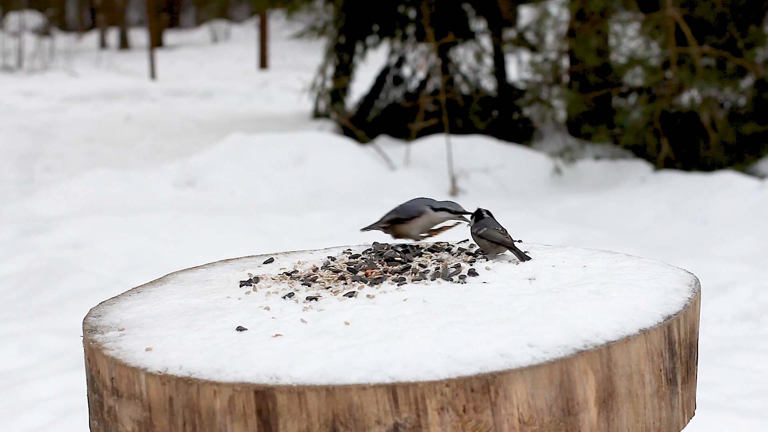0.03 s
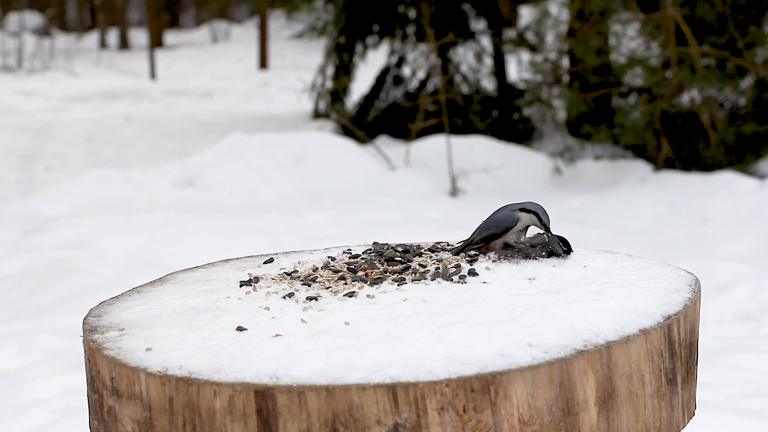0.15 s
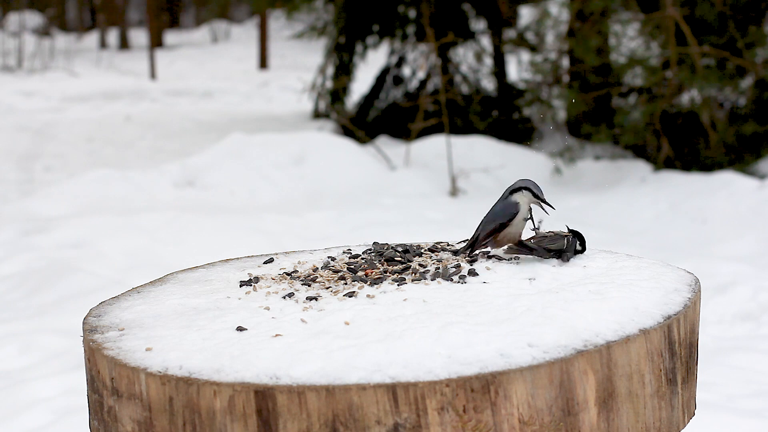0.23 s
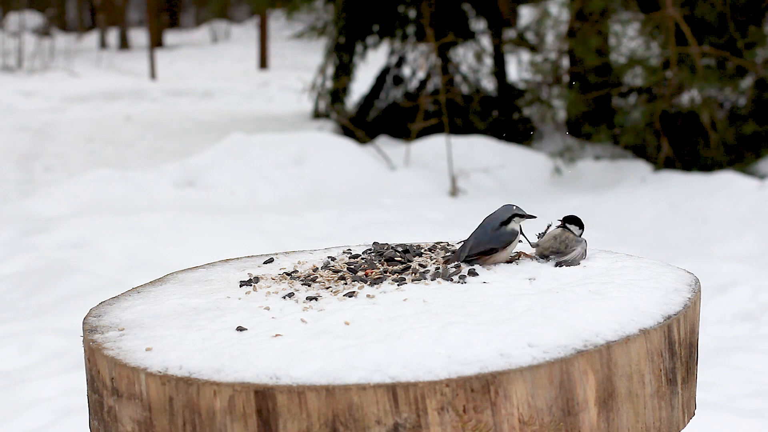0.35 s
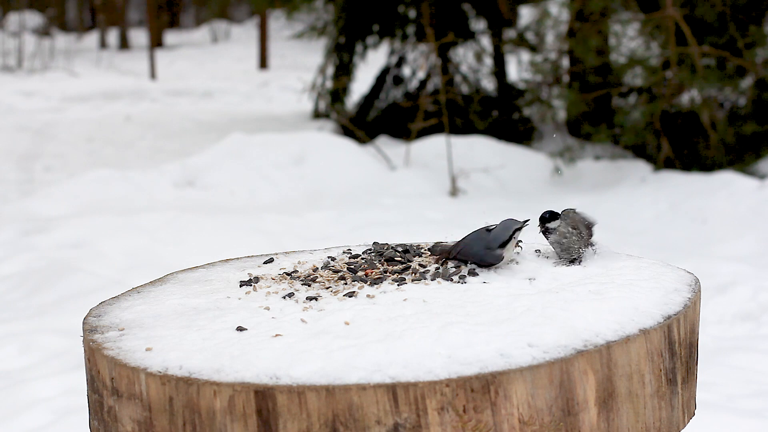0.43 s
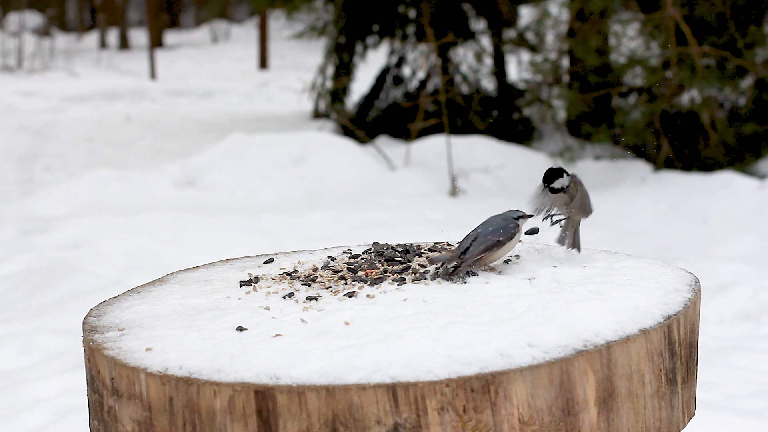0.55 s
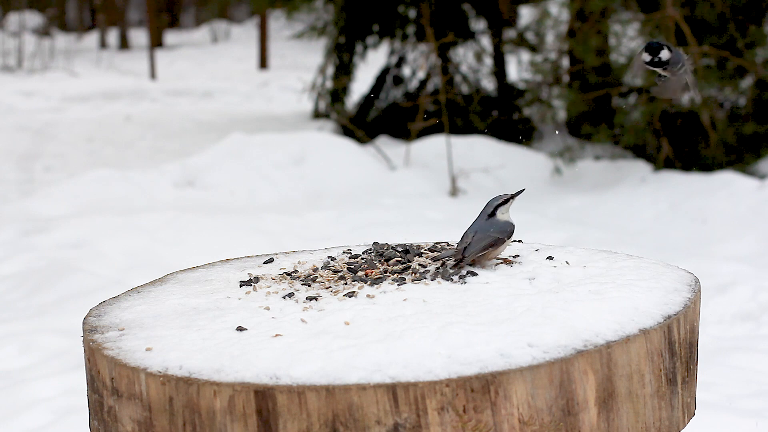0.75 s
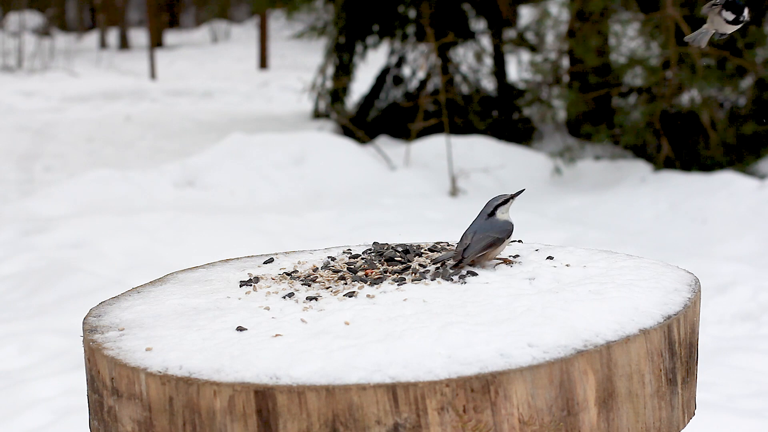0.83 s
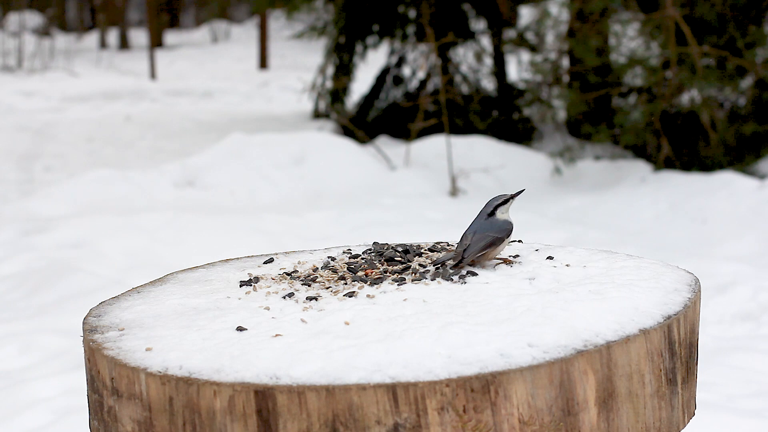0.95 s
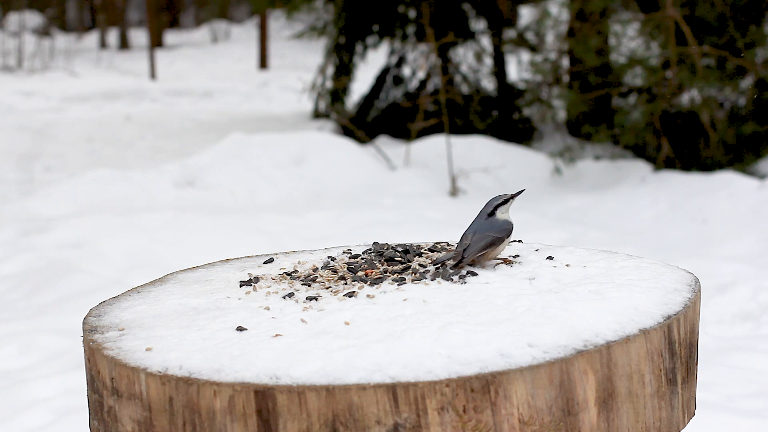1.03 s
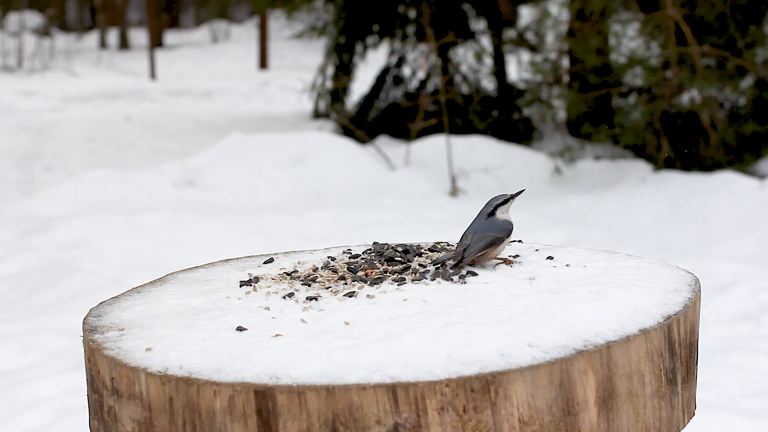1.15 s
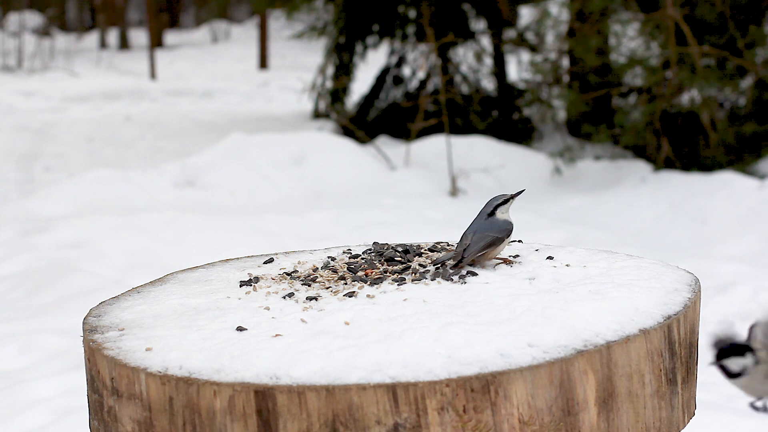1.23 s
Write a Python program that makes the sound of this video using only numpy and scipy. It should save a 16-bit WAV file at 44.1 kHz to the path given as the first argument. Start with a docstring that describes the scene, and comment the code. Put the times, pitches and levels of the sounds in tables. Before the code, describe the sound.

A small bird chirps five quick high notes while wings flutter in a scuffle.

```python
"""Wings flutter close to the microphone: two small birds scuffle on a feeding stump by a snowy wood.
Five thin whistled chirps each climb in steps from 7 kHz to 9 or 10 kHz, crossed by two harsh squeaks.
Claws tick on seeds, feathers rustle, and beating wings hum in a soft rush of air.
The trees throw back a faint echo, and a low distant rumble lies under everything."""
import sys
import numpy as np
from scipy import signal
from scipy.fft import rfft, irfft
from scipy.io import wavfile
from scipy.ndimage import uniform_filter1d

SR = 44100
rng = np.random.default_rng(int(sys.argv[2]) if len(sys.argv) > 2 else 0)


def transcribe(u):
    """Save the signal u as a 16-bit wav file named by the first command-line argument.

    u: samples, shape (n,) or (channels, n), limited to [-1, 1]; the rate is SR.
    q: integer samples, one column per channel.
    """
    v = np.clip(np.atleast_2d(u).T, -1, 1)
    q = np.round(v * 32767).astype(np.int16)
    wavfile.write(sys.argv[1], SR, q)


N = 57330
T = np.arange(N) / SR
CUTOFF_HZ = 15900


def chirps():
    """Nearly pure whistles at the stump, gliding up in steps, with a faint octave where they are loud."""
    # One list per chirp. Each row: time in seconds, pitch in Hz, relative level in dB.
    contours = [
        [(0.2258, 7120, -30.1), (0.2268, 7700, -22.0), (0.233, 7990, -15.5), (0.2407, 8110, -14.0),
         (0.2467, 8940, -18.4), (0.2567, 8910, -16.2), (0.261, 9230, -18.5), (0.2632, 8840, -20.0),
         (0.2649, 7410, -29.2)],
        [(0.293, 7260, -16.3), (0.294, 7210, -11.8), (0.3012, 7250, -7.3), (0.3077, 7410, -7.5),
         (0.3132, 8130, -10.5), (0.3237, 8190, -10.7), (0.3287, 9150, -16.3), (0.3302, 8790, -19.3),
         (0.3312, 8480, -28.3)],
        [(0.3637, 7000, -17.0), (0.3647, 7010, -11.0), (0.3692, 7300, -6.2), (0.3739, 7660, -5.5),
         (0.3817, 8660, -11.5), (0.3861, 8360, -9.7), (0.3946, 8300, -11.6), (0.4001, 9240, -20.0),
         (0.4021, 8640, -27.5)],
        [(0.4438, 7250, -12.3), (0.4453, 7250, -7.9), (0.4498, 7280, -5.5), (0.4578, 7330, -6.8),
         (0.4627, 8310, -4.2), (0.4685, 8100, -3.0), (0.4752, 8420, -4.3), (0.4805, 9740, -14.4),
         (0.4847, 9710, -17.0), (0.4877, 9320, -22.1), (0.4889, 9120, -28.4)],
        [(0.5466, 7080, -14.1), (0.5476, 7100, -10.8), (0.5536, 7100, -6.4), (0.5606, 7170, -4.8),
         (0.5668, 8660, -11.6), (0.5763, 8200, -9.6), (0.5783, 8290, -10.4), (0.5823, 9640, -16.5),
         (0.5848, 10030, -16.1), (0.5935, 9070, -15.0), (0.5975, 9080, -19.8), (0.5992, 8910, -28.9)],
    ]
    # One value per chirp: its second harmonic in dB at full scale; the share grows with loudness.
    octaves_db = [-31, -26, -26.5, -29, -18.5]
    glide_s, waver_share, trim_db = .00037, .002, -.1
    calls = 0
    for rows, octave_db in zip(contours, octaves_db):
        hz, db = [uniform_filter1d(curve, int(glide_s * SR)) for curve in in_time(rows)]
        phase = wavering_phase(hz, waver_share, rate_hz=400)
        level = from_db(db + trim_db) * gate(rows)
        octave = from_db(octave_db) * level * np.sin(2 * phase)
        calls += np.sqrt(2) * level * (np.sin(phase) + octave)
    return calls


def squeaks():
    """Harsh calls at the stump: unsteady pulses that speed up and brighten, with hiss on every pulse."""
    # One list per squeak. Each row: time in seconds, pulse rate in Hz, level in dB, tilt in dB per octave.
    contours = [
        [(.2942, 1080, -32, -5.5), (.2975, 1143, -32, -4), (.299, 1798, -30.5, -4.5), (.3027, 1900, -30.5, 1),
         (.304, 1900, -51.5, -2.5)],
        [(.3358, 950, -30, -3.5), (.338, 1250, -25, -3.5), (.3396, 1570, -29, -3.5), (.341, 2050, -24.5, 4),
         (.3434, 2214, -22.5, 1.5), (.3452, 2750, -18.5, 5.5), (.3475, 3800, -42, -2.5),
         (.3503, 5900, -35.5, -1)],
    ]
    # The colour of the voice. Each row: frequency in Hz, relative level in dB.
    voice_colour = [(900, -3.5), (2200, 0.5), (3300, -8.5), (4800, 2), (7000, -4.5), (9200, 4),
                    (11000, -14), (13000, -23.5), (16000, -28)]
    jitter_share, shimmer_db, hiss_db = .031, 3, -11.5
    calls = 0
    for rows in contours:
        hz, db, tilt = in_time(rows)
        phase = wavering_phase(hz, jitter_share, rate_hz=600)
        tone, power = 0, 1e-9
        for k in range(1, 13):
            gain = from_db(at_hz(voice_colour, k * hz) + tilt * np.log2(k)) * (k * hz < CUTOFF_HZ)
            tone += gain * np.sin(k * phase) * from_db(shimmer_db * drift(300))
            power += gain ** 2 / 2
        hiss = from_db(hiss_db) * noise(voice_colour) * (1 + np.cos(phase))
        calls += from_db(db) * gate(rows) * (tone / np.sqrt(power) + hiss)
    return calls


def wings():
    """Each close stroke is a short swell of grainy feather noise; a lighter rustle goes on between."""
    # Wing strokes. Each row: peak time in seconds, level in dB, half length in seconds,
    # tilt in dB per octave.
    wingbeats = [(0.047, -48, 0.0077, 0), (.076, -40.5, 0.0013, 0.5), (0.11, -45.5, 0.0053, -1.5),
                 (0.185, -45, .008, 0.5), (0.208, -48, 0.014, 7), (0.266, -45.5, 0.012, 5.5),
                 (0.393, -38, 0.0049, 4.5), (0.429, -45, .006, 2), (0.463, -41, 0.0081, 8),
                 (.511, -49, 0.013, 1), (0.526, -39.5, 0.0067, 2), (0.549, -32.5, 0.0014, 0),
                 (.571, -49, .005, -2), (0.592, -39.5, 0.008, 2.5), (0.621, -47, 0.0091, 0),
                 (0.64, -40, 0.0095, 1), (0.702, -46, 0.018, 1), (0.714, -48.5, 0.0059, -3),
                 (.746, -48.5, 0.0072, 0), (0.786, -47, 0.014, 1), (.862, -49.5, 0.015, 0.5),
                 (.902, -48, 0.0058, -6.5), (1.068, -49.5, 0.0078, -7.5), (1.088, -47, 0.0024, -1.5),
                 (1.195, -48, .006, 1), (1.226, -48.5, .006, -5), (1.26, -47.5, 0.0066, -6)]
    # The colour of rubbing feathers. Each row: frequency in Hz, relative spectral density in dB.
    feather_colour = [(300, -16.5), (1000, 0), (2200, 2.5), (4000, -4), (6000, -6.5), (9000, -6.5),
                      (12000, -5.5), (16000, -10)]
    # Loose feathers and scattered seed. Each row: time in seconds, level in dB.
    rustle_levels = [(0, -65), (.15, -55), (.45, -53), (.53, -49.5), (.65, -55), (.8, -58), (.95, -58.5),
                     (1.15, -69), (1.23, -59.5), (1.3, -53)]
    rustle_db, = in_time(rustle_levels)
    strokes = sum(swell(s, db, half) * noise(feather_colour, tilt) for s, db, half, tilt in wingbeats)
    grain = rms_one(from_db(2 * drift(rate_hz=500)))   # a fast flicker of about 2 dB
    return grain * (strokes + from_db(rustle_db) * noise(feather_colour))


def whirr():
    """A bird in flight nearby hums on the low multiples of its wingbeat, in a soft rush of air."""
    # The rise and fall of the flight sound. Each row: time in seconds, relative level in dB.
    flight_levels = [(0, -50.5), (.42, -51.5), (.55, -45.5), (.65, -35.5), (.75, -42), (.86, -42),
                     (.95, -73), (1.16, -62.5), (1.22, -36.5), (1.3, -43)]
    # The hum of the wings. Each row: multiple of the wingbeat, relative level in dB.
    hum_partials = [(2, -6), (3, -0.5), (4, -4), (5, -10.5), (6, -4.5)]
    # Air pushed by the wings. Each row: frequency in Hz, relative spectral density in dB.
    draught_colour = [(20, -2), (45, -19.5), (78, -9), (120, -10), (200, -17), (400, -22), (1000, -26.5),
                      (4000, -47.5)]
    wingbeat_hz, flicker_db, hum_db, draught_db = 26.43, 2, -5, -4
    flight_db, = in_time(flight_levels)
    phase = wavering_phase(wingbeat_hz, share=.049, rate_hz=6)
    hum = 0
    for k, db in hum_partials:
        partial = np.sin(k * phase + rng.uniform(0, 2 * np.pi))
        hum += partial * from_db(db + flicker_db * drift(15))
    draught = from_db(draught_db) * noise(draught_colour)
    return from_db(flight_db) * (from_db(hum_db) * rms_one(hum) + draught)


def claws():
    """Claws and seeds tick dry and bright on the stump."""
    # Claws striking seeds. Each row: start in seconds, level in dB, decay time in seconds.
    tick_times = [(0.1636, -25, .0005), (0.1724, -27.5, .0006), (0.176, -37, .009), (0.1819, -27.5, .0005),
                  (.78, -38, .001)]
    # The colour of the ticks. Each row: frequency in Hz, relative spectral density in dB.
    tick_colour = [(1000, -15.5), (4000, -15), (8000, -5.5), (10000, 3.5), (13000, -0.5), (16000, -5)]
    ticks = sum(from_db(db) * (T >= s) * np.exp(-np.abs(T - s) / decay) for s, db, decay in tick_times)
    return ticks * noise(tick_colour)


def rasp():
    """A short breathy rasp under the first chirp."""
    # Puffs of breath. Each row: peak time in seconds, level in dB, half length in seconds.
    rasp_times = [(0.2288, -38, .0012), (0.235, -51, 0.005), (.2575, -43.5, .0018)]
    # Their colour. Each row: frequency in Hz, relative spectral density in dB.
    rasp_colour = [(2500, -37), (4200, -16.5), (5000, -7), (6300, -4), (8000, -5), (14000, -25.5)]
    return sum(swell(*row) for row in rasp_times) * noise(rasp_colour)


def wood(birds):
    """An echo off the nearest conifers, smeared by branches, and a faint tail from the trunks behind."""
    tail_db, tail_delay_s, t60_s = -30, .016, .34
    echo_db, echo_delay_s, echo_spread_s = -31, .043, .0069
    tail = rng.standard_normal(N) * from_db(-60 * T / t60_s) * (T > tail_delay_s)
    echo = rng.standard_normal(N) * swell(echo_delay_s, 0, echo_spread_s)
    response = (from_db(tail_db) * rms_one(tail) + from_db(echo_db) * rms_one(echo)) / np.sqrt(N)
    return signal.fftconvolve(birds, response)[:N]


def open_air(level_db=-41):
    """A steady rumble and faint hiss from far away."""
    # The colour of the background. Each row: frequency in Hz, relative spectral density in dB.
    air_colour = [(20, -13), (45, 3.5), (100, -3), (190, -5.5), (255, 1.5), (320, -2), (430, -3.5),
                  (540, -1.5), (750, -8.5), (1000, -13.5), (1400, -22.5), (2500, -26), (5000, -28),
                  (10000, -27.5), (16000, -34)]
    return from_db(level_db) * noise(air_colour)


def from_db(db):
    """Decibels to gain."""
    return 10 ** (np.asarray(db) / 20)


def rms_one(x):
    """Scale to unit rms."""
    return x / np.sqrt(np.mean(x ** 2) + 1e-20)


def in_time(rows):
    """Each column of a curve at every sample."""
    times, *columns = np.transpose(rows)
    return [np.interp(T, times, column) for column in columns]


def at_hz(colour, hz):
    """Read a spectrum in dB on a log-frequency axis."""
    points_hz, db = np.transpose(colour)
    return np.interp(np.log(hz + 1), np.log(points_hz), db)


def noise(colour, tilt_db=0):
    """Noise of a given spectrum, tilted in dB per octave above about 1 kHz; rms 1."""
    hz = np.fft.rfftfreq(N, 1 / SR)
    gain = from_db(at_hz(colour, hz) + tilt_db * np.log2(1 + hz / 1000))
    return rms_one(irfft(rfft(rng.standard_normal(N)) * gain, N))


def drift(rate_hz):
    """Smooth random wander; rms 1."""
    pole = np.exp(-2 * np.pi * rate_hz / SR)
    return rms_one(signal.lfilter([1], [1, -2 * pole, pole * pole], rng.standard_normal(2 * N))[N:])


def wavering_phase(hz, share, rate_hz):
    """Phase of a tone whose pitch wanders by a share of itself."""
    return 2 * np.pi * np.cumsum(hz * (1 + share * drift(rate_hz))) / SR


def gate(rows, edge_s=.001):
    """Opens just before a call's first point and shuts just after its last."""
    inside_s = np.minimum(T - rows[0][0], rows[-1][0] - T)
    return np.sin(np.pi / 2 * np.clip(1 + inside_s / edge_s, 0, 1)) ** 2


def swell(peak_s, db, half_s):
    """A rounded rise and fall of level."""
    return from_db(db) * np.exp(-.5 * np.minimum(((T - peak_s) / half_s) ** 2, 100))


def scene():
    """One microphone at the edge of the wood: the birds close by, their echo, and the open air."""
    birds = chirps() + squeaks() + wings() + whirr() + claws() + rasp()
    return (birds + wood(birds) + open_air())[None]


def record(dry):
    """The highest treble is cut steeply."""
    return signal.sosfilt(signal.ellip(10, .1, 70, CUTOFF_HZ, fs=SR, output="sos"), dry)


dry = scene()
out = record(dry)
transcribe(out)
```